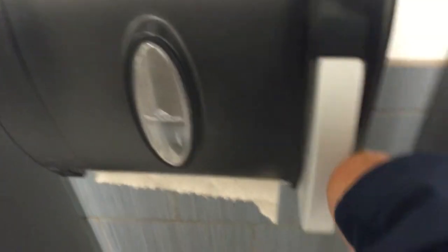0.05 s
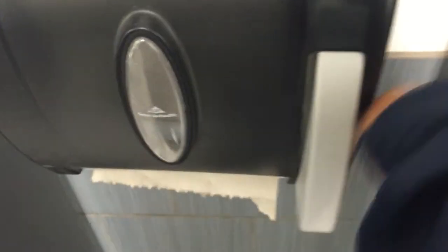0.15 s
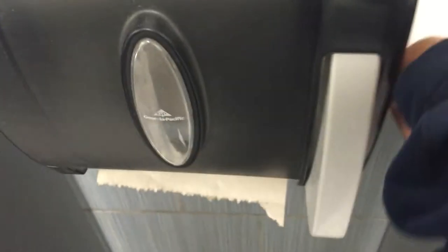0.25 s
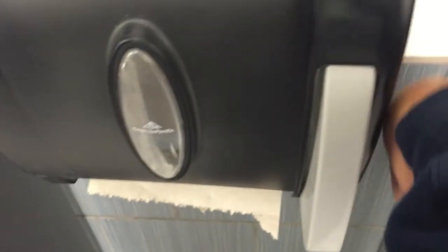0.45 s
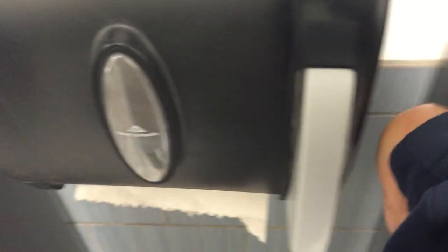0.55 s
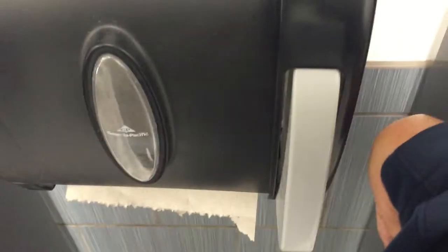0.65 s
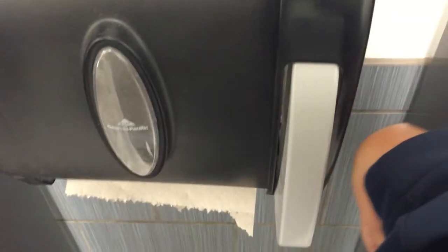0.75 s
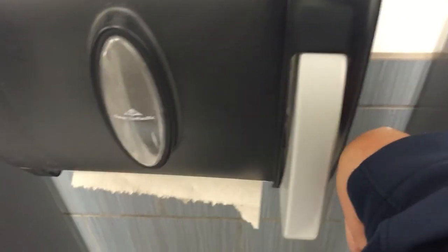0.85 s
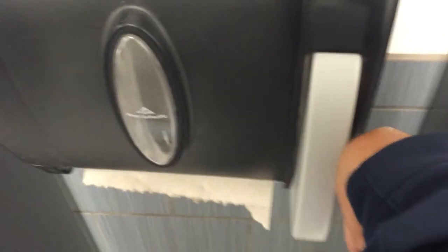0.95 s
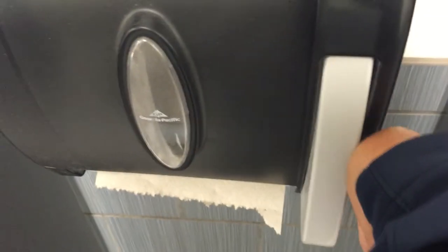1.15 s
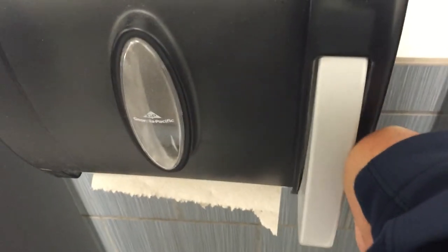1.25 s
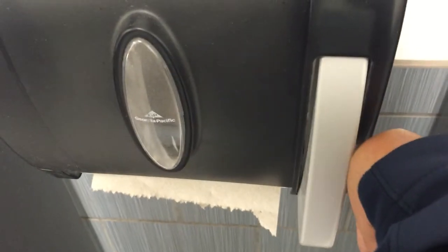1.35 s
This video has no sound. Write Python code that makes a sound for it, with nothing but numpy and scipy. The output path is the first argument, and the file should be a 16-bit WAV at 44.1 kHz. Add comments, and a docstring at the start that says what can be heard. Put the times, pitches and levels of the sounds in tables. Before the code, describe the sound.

A plastic towel dispenser lever slams and rattles in an echoing tiled room.

```python
"""The lever of a plastic towel dispenser, worked by hand, slams against its stop and rattles.
Knocks of the linkage and lever excite the modes of the hollow housing, and the lever's resonances
colour the clicks. The small tiled room booms and reverberates for a second, with a brief thin hiss
in the decay. Later the hand settles on the lever with small ticks, over the building's steady rumble."""
import sys
import numpy as np
from scipy import signal
from scipy.io import wavfile

SR = 44100
rng = np.random.default_rng(int(sys.argv[2]) if len(sys.argv) > 2 else 0)


def to_wav(s):
    """Save 16-bit WAV."""
    ch = np.atleast_2d(s).T  # columns
    pcm = np.round(np.clip(ch, -1, 1) * 32767)  # PCM
    wavfile.write(sys.argv[1], SR, pcm.astype(np.int16))


N = 61739


def amp(db):
    return 10 ** (np.asarray(db) / 20)


def fade(t, t60):
    """Exponential decay: zero before t = 0, then 60 dB down in t60."""
    return (t >= 0) * amp(-60 * np.maximum(t, 0) / t60)


def ring(x, hz, t60):
    """Damped oscillator: its impulse response is a decaying sine of unit amplitude."""
    r, w = amp(-60 / (t60 * SR)), 2 * np.pi * hz / SR
    return signal.lfilter([0, np.sin(w)], [1, -2 * r * np.cos(w), r * r], x + 1e-18)


def resonate(x, hz, width_hz):
    """Two-pole resonance with unit gain at its peak."""
    r, w = np.exp(-np.pi * width_hz / SR), 2 * np.pi * hz / SR
    return signal.lfilter(np.array([1, 0, -1]) * (1 - r * r) / 2, [1, -2 * r * np.cos(w), r * r], x)


def soften(x, hz):
    """Critically damped low-pass: an impulse spreads into a smooth pulse."""
    r = np.exp(-2 * np.pi * hz / SR)
    return signal.lfilter([(1 - r) ** 2], [1, -2 * r, r * r], x)


def roll_off(x, kind, hz):
    """Second-order "low" or "high" pass, 12 dB per octave."""
    return signal.sosfilt(signal.butter(2, hz, kind, fs=SR, output="sos"), x)


def linger(power, t60):
    """Leaky integration: power falls 60 dB in t60, and total energy is conserved."""
    r = amp(-120 / (t60 * SR))
    return signal.lfilter([1 - r], [1, -r], power)


def third_octaves():
    """Constant-percentage bandwidth: yields each band's centre, filter and share of white noise."""
    edges = 22 * 2 ** np.arange(0, 9.7, 1 / 3)
    white = rng.standard_normal((2, N + SR // 2))
    for k, (low, high) in enumerate(zip(edges, edges[1:])):
        sos = signal.butter(2, [low, high], "band", fs=SR, output="sos")
        yield np.sqrt(low * high), sos, signal.sosfilt(sos, white[k % 2])[SR // 2:]


def at_hz(table, hz, column):
    """Interpolation on a logarithmic frequency axis."""
    table = np.array(table)
    return np.interp(np.log(hz), np.log(table[:, 0]), table[:, column])


# background spectrum: (frequency [Hz], relative spectral density [dB])
BACKGROUND_SPECTRUM = [(20, -21), (60, -2.5), (120, -5.5), (290, -12), (600, -30.5), (1500, -36),
                       (3000, -38), (6000, -45), (15500, -47.5)]

def background(level_db=-57):
    """Stationary random noise: the rumble of the building and the hiss of the microphone."""
    noise = sum(amp(at_hz(BACKGROUND_SPECTRUM, hz, 1)) * band for hz, _, band in third_octaves())
    return amp(level_db) * noise / noise.std()


def hiss(start_s=.621, rise_s=.004, hold_s=.07, centre_hz=9750, level_db=-67.5):
    """Band-limited noise: a thin treble hiss rises, holds and decays exponentially."""
    t = np.arange(N) / SR - start_s
    noise = resonate(rng.standard_normal(N), centre_hz, width_hz=840)
    noise = roll_off(noise, "high", .53 * centre_hz)
    envelope = np.clip(t / rise_s, 0, 1) * fade(np.maximum(t - hold_s, 0), t60=.39)
    return amp(level_db) * envelope * noise / noise.std()


# low modes of wall and room: (frequency [Hz], level [dB], T60 [s], build-up time [s])
ROOM_MODES = [(36.4, -32.5, 0.73, 0.046), (67.3, -18.5, 0.74, 0.089), (63.9, -45.5, 7.2, 0.073),
              (272.6, -25.5, 1.22, 0.1184)]

def room_boom(slam_s=.2525):
    """Standing waves: each low mode builds up after the slam and decays slowly."""
    t = np.maximum(np.arange(N) / SR - slam_s, 0)
    return sum(amp(db) * (1 - np.exp(-t / build)) * fade(t, t60) * np.sin(2 * np.pi * hz * t)
               for hz, db, t60, build in ROOM_MODES)


# diffuse field before colouring: (frequency [Hz], energy relative to the direct sound [dB], T60 [s])
DIFFUSE_FIELD = [(98.5, -1, 1.47), (208.4, -11, 0.93), (400, -2, 1.09), (820, -3.5, 1.276),
                 (1550, -4, 1.25), (3050, -8.5, 1.075), (5926, -11, 1.12), (9310, -14, 0.7),
                 (14100, -7.5, 0.24)]
# bands of the lever's ring that stand out in the tail: (frequency [Hz], bandwidth [Hz], gain [dB])
TAIL_COLOUR = [(1524, 130, -9), (2370, 300, -8.5), (4440, 350, 2), (6200, 530, 3), (8500, 500, -3)]

def reverberation(direct, swell_s=.0033):
    """Diffuse-field decay: in each band the energy of the direct sound lingers as noise."""
    tail = 0
    for hz, sos, noise in third_octaves():
        power = signal.sosfilt(sos, direct + 1e-12) ** 2
        power = linger(power, swell_s * np.log(1e6))   # time constant converted to T60
        power = linger(power, t60=at_hz(DIFFUSE_FIELD, hz, 2))
        tail = tail + amp(at_hz(DIFFUSE_FIELD, hz, 1)) * np.sqrt(power) * noise / noise.std()
    return tail + sum(amp(db) * resonate(tail, hz, width) for hz, width, db in TAIL_COLOUR)


# drags of the hand: (time [s], duration [s], level [dB], centre frequency [Hz], bandwidth [Hz])
HAND_RUBS = [(.005, 0.04, -48, 176, 94.2), (0.105, 0.11, -41.5, 188, 56), (1.034, 0.041, -63, 216, 120.7),
             (1.15, 0.065, -62.5, 531, 391), (1.175, 0.08, -48.5, 138, 69.3),
             (1.223, 0.057, -52, 248.6, 250), (1.273, 0.097, -49.5, 186, 77)]

def hand_rubs():
    """Friction noise: the hand drags on the lever in dull swells, each under a half-sine envelope."""
    out, t = 0, np.arange(N) / SR
    for start, duration, db, hz, width in HAND_RUBS:
        noise = resonate(rng.standard_normal(N), hz, width)
        noise = resonate(noise, hz, width)   # a second pass steepens the skirts
        swell = np.sin(np.pi * np.clip((t - start) / duration, 0, 1))
        out = out + amp(db) * swell * noise / noise.std()
    return out


# faint pitched ticks: (time [s], level [dB], frequency [Hz], T60 [s])
SETTLING_TICKS = [(1.043, -50, 842, 0.042), (1.2341, -62, 2100, .11), (1.2864, -56.5, 2824, 0.047),
                  (1.292, -52, 1310, 0.056)]

def settling_ticks():
    """Free vibration: each tick of the settling hand is a single damped sine."""
    t = np.arange(N) / SR
    return sum(amp(db) * fade(t - start, t60) * np.sin(2 * np.pi * hz * (t - start))
               for start, db, hz, t60 in SETTLING_TICKS)


# sharp plastic contacts: (time [s], excitation level [dB], cutoff frequency [Hz], T60 [s])
LEVER_CONTACTS = [(.087, -32, 550, 0.059), (.099, -42, 2800, 0.032), (.106, -34.5, 1200, 0.047),
                  (.166, -46, 15450, 0.0086), (.189, -24.5, 953, 0.091), (0.1953, -31, 3500, 0.062),
                  (0.1992, -24, 2500, 0.012), (.208, -38, 900, 0.035), (0.223, -28, 1000, 0.18),
                  (0.2312, -30.5, 1500, 0.12), (.240, -48, 1200, 0.055), (0.2498, -26, 5900, 0.036),
                  (0.2545, -18.5, 12000, 0.06), (.2600, -15.5, 9000, 0.015), (0.264, -15.5, 5000, 0.026),
                  (0.2743, -23, 9000, 0.038), (.281, -18.5, 2000, .04), (1.033, -54, 1200, 0.057),
                  (1.042, -54.5, 1170, 0.058), (1.05, -48.5, 1000, 0.055), (1.153, -52, 571, 0.098),
                  (1.183, -54, 606, .06), (1.234, -60, 574, 0.13), (1.2868, -42.5, 10000, 0.0083)]
# resonances of lever and linkage: (frequency [Hz], bandwidth [Hz], gain [dB])
LEVER_RESONANCES = [(581, 150, 9.5), (940, 560, 6), (1440, 190, 7.5), (1920, 550, 5), (2872, 500, 0),
                    (4210, 170, 0), (5860, 410, -1), (8380, 1100, -7.5), (9300, 300, -11),
                    (13000, 2390, -5)]

def lever_clicks(rise_s=.0008, broadband_db=-5):
    """Source and filter: noise bursts, dulled by the contact, excite the resonances of the lever."""
    bursts, t = np.zeros(N), np.arange(3000) / SR
    for start, db, cutoff_hz, t60 in LEVER_CONTACTS:
        i = int(start * SR)
        envelope = amp(db) * fade(t, t60) * (1 - np.exp(-t / rise_s))
        bursts[i:i + t.size] += roll_off(envelope * rng.standard_normal(t.size), "low", cutoff_hz)
    bursts = roll_off(bursts, "high", 310)
    ringing = sum(amp(db) * resonate(bursts, hz, width) for hz, width, db in LEVER_RESONANCES)
    return amp(broadband_db) * bursts + ringing


# knocks of linkage and lever, higher in cutoff when harder: (time [s], impulse level [dB], cutoff [Hz])
LEVER_IMPACTS = [(0.084, -34.5, 421), (.093, -38.5, 491), (0.187, -29.5, 608), (.196, -25.5, 1612),
                 (0.208, -29.5, 516), (.224, -27.5, 498), (.236, -17.5, 293.7), (.246, -14.5, 295.4),
                 (0.2528, -7, 700), (0.261, -15.5, 1470), (0.274, -10, 603), (1.037, -55.5, 900),
                 (1.187, -35, 153.4), (1.233, -36, 202), (1.246, -33, 251.5), (1.286, -35.5, 255)]
# modes of the hollow housing: (frequency [Hz], gain [dB], T60 [s])
HOUSING_MODES = [(134.5, -16.5, 0.074), (181, -7.5, 0.2), (234.4, -9, .08), (270, -5, 0.11),
                 (322.9, -7.5, 0.072), (442, -12, 0.091), (502, -10.5, 0.035), (538.6, -15, 0.11),
                 (607, -23, 0.043), (1080, -12.5, .03)]

def housing_knocks(radiates_above_hz=170.6):
    """Modal superposition: each force pulse rings the same modes; a small box radiates bass poorly."""
    force, impulse = np.zeros(N), signal.unit_impulse(1000)
    for start, db, cutoff_hz in LEVER_IMPACTS:
        i = int(start * SR)
        force[i:i + impulse.size] += soften(amp(db) * impulse, cutoff_hz)
    vibration = sum(amp(db) * ring(force, hz, t60) for hz, db, t60 in HOUSING_MODES)
    return roll_off(vibration, "high", radiates_above_hz)


def scene():
    """Linear superposition: direct sound, room response and faint sounds add in one channel."""
    direct = housing_knocks() + lever_clicks()
    room = reverberation(direct) + room_boom()
    return (direct + room + hand_rubs() + settling_ticks() + hiss() + background())[None]


def record(dry, low_cut_hz=27, high_cut_hz=15500):
    """Band limiting: the microphone loses the deepest bass, and the top treble is cut steeply."""
    steep_low_pass = signal.ellip(12, .5, 75, high_cut_hz, fs=SR, output="sos")
    return signal.sosfilt(steep_low_pass, roll_off(dry, "high", low_cut_hz))


dry = scene()
out = record(dry)
to_wav(out)
```